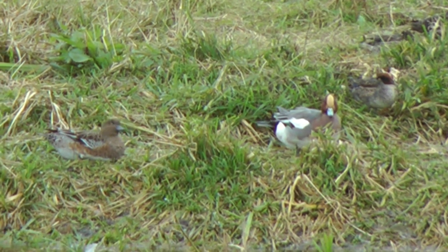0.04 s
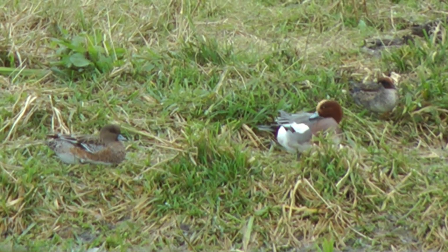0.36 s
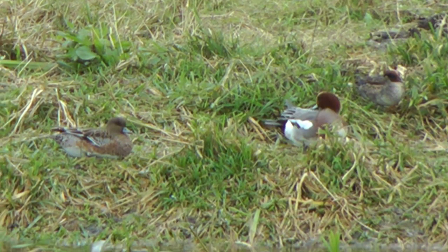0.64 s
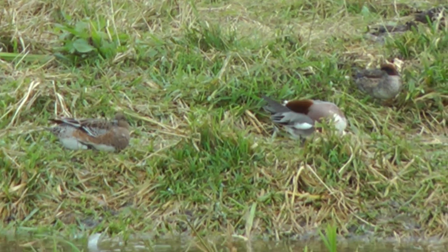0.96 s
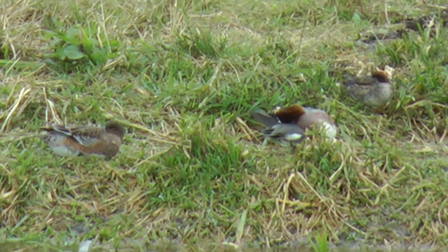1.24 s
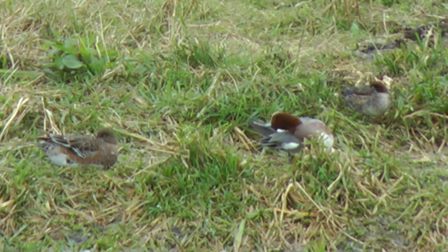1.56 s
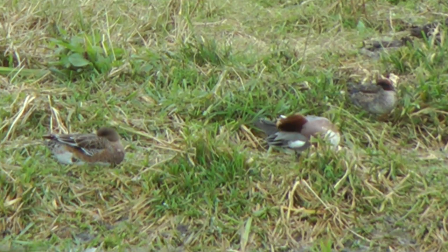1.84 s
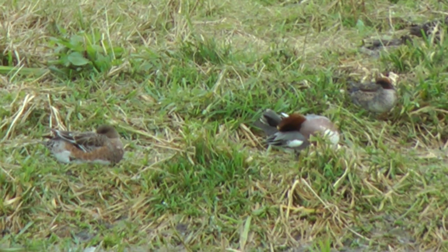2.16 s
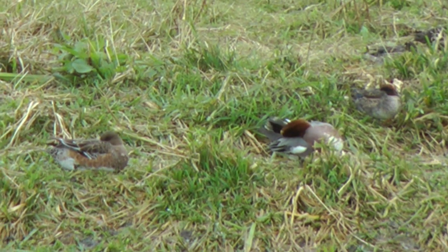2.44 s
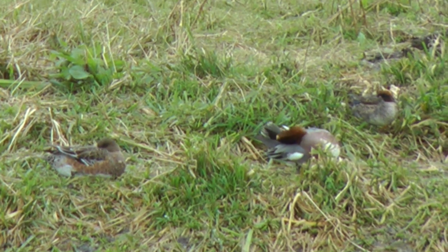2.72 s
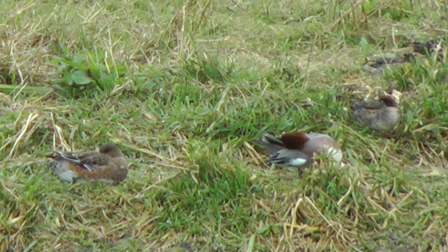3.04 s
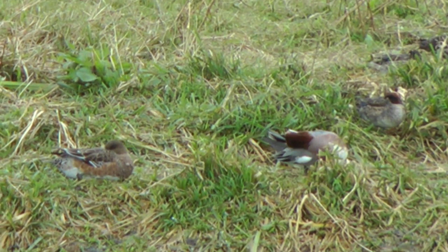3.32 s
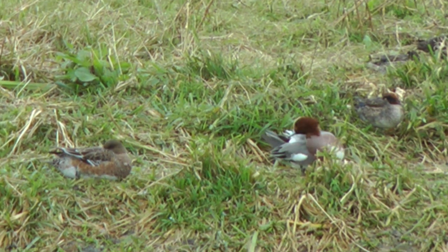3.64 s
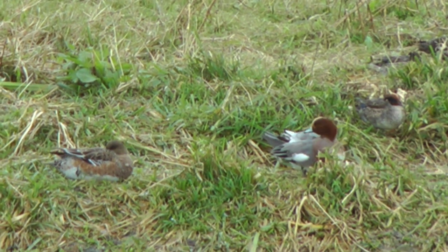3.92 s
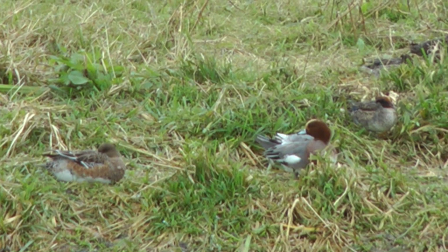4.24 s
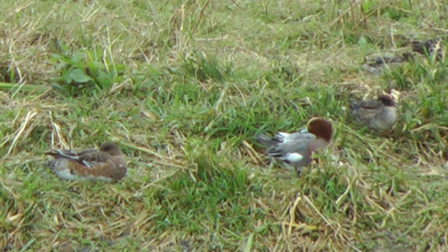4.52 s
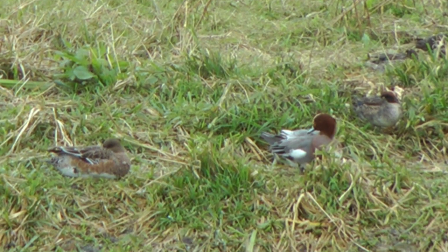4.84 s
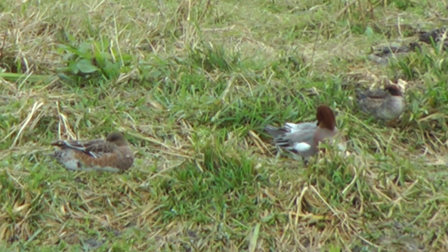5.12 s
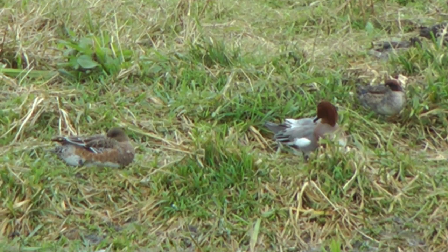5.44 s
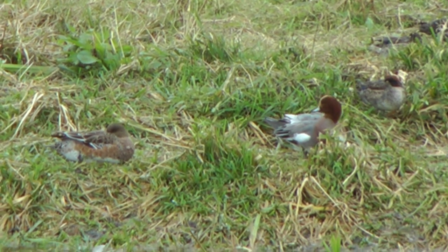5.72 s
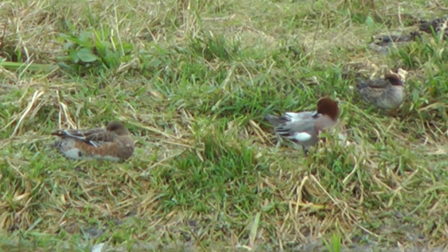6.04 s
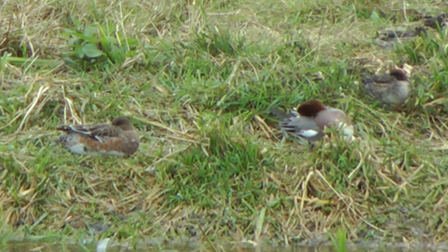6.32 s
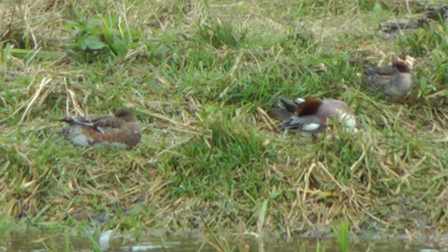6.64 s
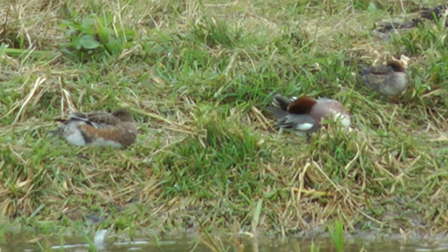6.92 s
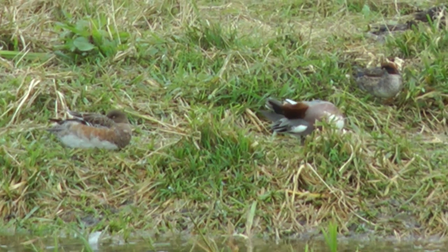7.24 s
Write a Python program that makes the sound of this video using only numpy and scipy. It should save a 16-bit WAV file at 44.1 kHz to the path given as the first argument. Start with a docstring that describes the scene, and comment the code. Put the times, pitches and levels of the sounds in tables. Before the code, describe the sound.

A steady outdoor hush lies over a grassy wetland bank, with a faint crackle of grass and water. From the start, distant ducks give thin, arching whistles and short raspy yelps with a slight echo. At about 0.2 seconds a hard gust cracks, rumbles and flutters on the microphone until roughly 0.7 seconds; it is the loudest sound and briefly dips the volume. Weaker gusts come near 2, 2.7, 4.5 to 5.4, 6 and 7 seconds. Small dry ticks fall around 1.1, 1.9, 2.4 and 4.7 seconds. Near 4 seconds one closer duck on the left gives a short whistle that glides up and then down, echoing lightly. The far flock keeps calling on and off over faint marsh chatter. The hush swells gently near 5.7 seconds, and a few soft rustles follow until the end at about 7.5 seconds.

```python
"""Wigeon (a kind of duck) whistle on a grassy wetland bank, over the steady hush of open land.
The flock whistles and yelps far off from the start. At once the hardest gust cracks, rumbles and flutters
on the microphone, which turns itself down for a moment. Weaker gusts and small dry ticks follow.
Near 4 s one drake (a male) close by on the left gives a "whee-oo", a tone that glides up and down.
Near 5.7 s the hush swells once, and a few rustles come towards the end."""
import sys
import numpy as np
from scipy import signal
from scipy.fft import rfft, irfft, next_fast_len
from scipy.io import wavfile
from scipy.ndimage import uniform_filter1d, minimum_filter1d

SR = 44100
rng = np.random.default_rng(int(sys.argv[2]) if len(sys.argv) > 2 else 0)


def output_pcm(signal):
    """Save a mono or channel-first signal as 16-bit PCM at the path in sys.argv[1].

    Samples are clipped to [-1, 1] before scaling.
    """
    pcm = np.clip(np.atleast_2d(signal).T, -1, 1) * 32767
    wavfile.write(sys.argv[1], SR, np.round(pcm).astype(np.int16))


N = 329427
TIME = np.arange(N) / SR


def drake():
    """The near bird and its echoes; its throat rings near 4300 Hz, lifting the octave as the pitch falls."""
    # the path of the "whee-oo": t/s, f/Hz, relative level/dB
    whee_oo = [(3.88, 1390, -50), (3.905, 2660, -49), (3.931, 3050, -49), (3.94, 3405, -47),
               (3.96, 3350, -45), (3.966, 3010, -49.5), (3.987, 2844, -50), (3.996, 2854, -43.5),
               (4.021, 2714, -52), (4.029, 2664, -43), (4.051, 2510, -43), (4.057, 2166, -48),
               (4.116, 1794, -48)]
    # the throat's boost: f/Hz, gain/dB
    throat = [(3400, 0), (4300, 13), (5100, -2)]
    voice = whistles([whee_oo], breath=.015, shimmer_db=2, edge_s=.004, waver=.006)
    call = filtered(voice, lambda hz: amp(along(throat, hz)))
    echo = amp(-5) * scatter(call, fade_s=.14)
    far_bank = amp(-12.5) * np.pad(call, (int(.135 * SR), 0))[:N]  # the call returns 0.135 s later
    return placed(call, left_db=8) + echo + far_bank


def whistles(calls, breath, shimmer_db, edge_s, waver):
    """Each path (t/s, f/Hz, level/dB) becomes a gliding tone; breath is its hoarse share, from 0 to 1."""
    out = np.zeros(N)
    hiss = wobble(600) + 1j * wobble(600)
    buzz_hz = 464.6 * np.exp(wobble(60) / 10)  # a hoarse throat buzzes under the whistle
    buzz = np.sin(2 * np.pi * np.cumsum(buzz_hz) / SR)
    rasp = np.sqrt(1 - breath) + np.sqrt(breath) * (.6 * hiss + .75 * buzz)
    shimmer = amp(shimmer_db * np.minimum(wobble(70), .5))  # the loudness flickers
    pitch_drift = 1 + waver * wobble(90)
    for call in calls:
        s, hz, db = np.transpose(call)
        on = slice(*np.searchsorted(TIME, [s[0] - edge_s, s[-1] + edge_s]))
        t = TIME[on]
        phase = 2 * np.pi * np.cumsum(np.interp(t, s, hz) * pitch_drift[on]) / SR
        fade = np.clip(1 + np.minimum(t - s[0], s[-1] - t) / edge_s, 0, 1)
        octave = amp(-22) * np.exp(2j * phase)  # a weak tone at twice the pitch
        tone = np.imag(rasp[on] * (np.exp(1j * phase) + octave))
        out[on] += np.sqrt(2) * fade * amp(np.interp(t, s, db)) * unit(shimmer[on]) * tone
    return out


def flock():
    """Farther birds: thin whistles broken by the moving air, and hoarse yelps, all blurred by echo."""
    # whistles at their highest pitch: t/s, f/Hz, relative level/dB, rise/s, fall/s
    thin_whistles = [ (0.041, 2600, -50, 0.079, 0.057), (.435, 2140, -43.5, .011, 0.013),
                     (0.57, 2845, -44.5, .039, 0.018), (.588, 2293, -44, 0.0084, 0.021),
                     (0.646, 3324, -57, 0.035, 0.15), (.901, 3050, -53.5, .05, .155),
                     (1.535, 3390, -58, 0.0713, .18), (3.151, 2540, -52, .034, 0.0049),
                     (3.195, 2357, -49.5, .01, .08), (3.405, 3265, -56, 0.059, 0.027),
                     (3.464, 2560, -54, 0.012, .05), (4.32, 3210, -55, 0.051, 0.067),
                     (4.378, 2476, -49.5, .013, 0.047), (4.435, 2950, -55.5, 0.0186, 0.072),
                     (4.52, 2244, -46.5, 0.023, 0.047), (4.77, 2930, -56, .025, .04),
                     (4.88, 2470, -52, 0.011, 0.052), (4.919, 2870, -56, .025, .06),
                     (5.595, 2180, -44.5, .01, 0.032), (6.445, 2870, -55, .015, 0.082), ]
    # short, raspy yelps at their highest pitch: t/s, f/Hz, relative level/dB
    yelps = [(.812, 1794, -47), (.932, 2110, -48), (1.959, 2660, -52.5), (2.089, 2996, -53),
             (2.221, 3045, -53.5), (2.463, 3140, -54.5), (3.104, 2480, -50.5), (3.24, 2586, -51),
             (4.334, 2160, -48.5), (5.555, 2880, -47), (5.88, 2140, -47), (6.255, 3190, -58),
             (7.22, 2570, -53)]
    arches = [whistle_path(*row) for row in thin_whistles]
    hooks = [path for row in yelps for path in yelp_paths(*row)]
    calls = whistles(arches, breath=.21, shimmer_db=6, edge_s=.008, waver=.017)
    calls += whistles(hooks, breath=.12, shimmer_db=3, edge_s=.008, waver=.014)
    return amp(-3.5) * calls + amp(-7.5) * scatter(calls, fade_s=.25)


def whistle_path(top_s, top_hz, db, rise_s, fall_s):
    """One flock whistle climbs steeply, rounds off at the top and falls more gently."""
    rise_hz_per_s, fall_hz_per_s, round_s = 34000, 7800, .018
    t = np.linspace(-rise_s, fall_s)
    below_hz = np.where(t < 0, rise_hz_per_s, fall_hz_per_s) * (np.hypot(t, round_s) - round_s)
    swell_db = .006 * below_hz  # louder below the top
    taper_db = 3.5 * (t / np.where(t < 0, rise_s, fall_s)) ** 2  # softer towards both ends
    return np.transpose([top_s + t, top_hz - below_hz, db + swell_db - taper_db])


def yelp_paths(top_s, top_hz, db):
    """One yelp goes up and down equally steeply: a main tone and a weaker, lower one."""
    half_s, drop_hz, taper_db = .028, 607.6, 3.5
    position = np.linspace(-1, 1)
    s = top_s + half_s * position
    hz = top_hz - drop_hz * position ** 2
    level = db - taper_db * position ** 2
    return np.transpose([s, hz, level]), np.transpose([s, .75 * hz, level - 5])


def chatter(count=190):
    """The rest of the marsh: many short, falling far notes that run together."""
    calls = []
    for when, pitch, bend, softness in rng.random((count, 4)):
        s = when ** .75 * TIME[-1]  # the marsh grows livelier
        hz = 1200 * 2.3 ** pitch
        db = -57 - 8 * softness - 5 * pitch
        calls.append([(s, hz, db), (s + .0496, hz * (1 - .225 * bend), db)])
    notes = whistles(calls, breath=.15, shimmer_db=3, edge_s=.015, waver=.012)
    return notes + .5 * scatter(notes, fade_s=.063)


def wind():
    """Slow pressure moves both microphone openings together; swirls thump and push left against right."""
    # swirls of air that hit the openings: t/s, flutter level/dB, thump level/dB, length/s
    swirls = [(0.212, -15.5, -21, 0.024), (0.286, -10, -32, 0.052), (0.32, -10.5, -14.5, 0.069),
              (0.364, -9.5, -18.5, 0.035), (0.446, -20, -26, 0.11), (0.634, -32, -38, 0.078),
              (0.72, -42.5, -31, 0.047), (1.249, -62, -42, 0.037), (2.002, -30.5, -30.5, 0.084),
              (2.286, -31.5, -34, 0.017), (2.749, -28, -25, 0.037), (2.821, -32, -30, 0.094),
              (2.921, -28.5, -40, 0.018), (2.967, -27, -45, 0.0084), (3.079, -45, -32.5, 0.024),
              (3.14, -53, -33.5, 0.021), (3.324, -51, -29.5, 0.036), (3.482, -41, -36, 0.027),
              (3.584, -41.5, -35, 0.047), (3.757, -40.5, -36, 0.012), (3.988, -49, -29, 0.0087),
              (4.023, -27.5, -26, 0.024), (4.151, -39.5, -37, 0.019), (4.455, -25.5, -17, 0.021),
              (4.513, -26.5, -29.5, 0.052), (4.603, -24.5, -35, 0.018), (4.781, -35, -31.5, 0.035),
              (4.922, -28.5, -26.5, 0.041), (5.023, -16.5, -21, 0.016), (5.219, -39, -31.5, 0.049),
              (5.401, -32, -27.5, .011), (6.11, -26.5, -22, 0.035), (6.319, -37, -31, 0.015),
              (6.541, -29, -30, 0.024), (7.04, -40, -29.5, 0.029), (7.125, -46, -35, 0.021),
              (7.376, -40, -33.5, 0.026)]
    # tone colours of the deep rumble, the flutter and the fine crackle: f/Hz, relative level/dB
    rumble_colour = [(20, -15.5), (75, 2.5), (100, -2.5), (130, -14), (250, -19), (1000, -87)]
    flutter_colour = [(40, -27), (130, -7), (235, 4), (320, 0), (430, -4), (500, -10.5), (1300, -36),
                      (8000, -112)]
    crackle_colour = [(300, -13), (460, 13.5), (1000, -1), (2000, -16), (7000, -74)]
    gust_db = gust_level()
    puff_db = 4.5 * np.minimum(wobble(24), 1)
    thumps = swells([(s, db, length) for s, _, db, length in swirls])
    pressure = steadied(noise(rumble_colour, alike=.99), span_s=.0341)
    rumble = np.hypot(amp(gust_db + puff_db), thumps) * pressure
    # flutter grows faster than the pressure that drives it
    gust_force = amp(1.5 * gust_db + 2 * puff_db + 1.5)
    swirl_force = swells([(s, db, length) for s, db, _, length in swirls])
    force = np.hypot(gust_force, swirl_force)
    lumps = unit(amp(3 * np.minimum(wobble(70), .5)))
    flutter = force * lumps * steadied(noise(flutter_colour, alike=-.61), span_s=.0092)
    # the hardest swirls break into finer ones that crackle
    grain = unit(amp(4 * wobble(300)))
    crackle = force ** 1.586 * grain * noise(crackle_colour, alike=-.52)
    return rumble + flutter + crackle


def gust_level():
    """Wind pressure in dB: each gust arrives fast, sags while it blows and dies away into the calm."""
    # gusts on the microphone: start/s, length/s, level/dB
    gusts = [(0.162, 0.56, -29.5), (1.956, 0.4, -38), (2.682, 0.37, -31.5), (3.43, 1, -40.5),
             (4.46, 0.926, -36), (6.044, 0.53, -37), (6.967, 0.6, -40.5)]
    rise_db_per_s, sag_db_per_s, fall_db_per_s, calm_db = 237, 4, 146, -55.5
    power = amp(calm_db) ** 2
    for start, length, db in gusts:
        age = TIME - start
        drop_db = (rise_db_per_s * np.maximum(-age, 0)
                   + sag_db_per_s * np.maximum(age, 0)
                   + fall_db_per_s * np.maximum(age - length, 0))
        power = power + amp(db - drop_db) ** 2
    return 10 * np.log10(power)


def ticks_and_rustles(faint_count=30):
    """A crack of wind and dry ticks with a short echo, faint ticks ever more often, and grainy rustles."""
    # a sharp crack of wind on the microphone, then small dry ticks: t/s, level/dB, f/Hz
    crack_and_ticks = [(.216, -40.5, 1880), (1.11, -37, 980), (1.879, -38.5, 1700), (2.3563, -39.5, 2890),
                       (2.3605, -45, 6000), (4.705, -40.5, 3000), (5.851, -51, 2600), (6.093, -45.5, 4500),
                       (7.177, -48, 4330)]
    # rustles along the bank: t/s, level/dB, length/s
    rustles = [(5.8, -55.5, 0.33), (6.89, -55.5, 0.1), (7.17, -59, 0.18), (7.44, -53, 0.11)]
    # tone colour of a rustle: f/Hz, relative level/dB
    rustle_colour = [(400, -32), (1250, -3), (2200, 11), (4000, -1), (12000, -50)]
    faint_ticks = [(np.sqrt(when) * TIME[-2], -50.5 - 9 * softness, 3800)
                   for when, softness in rng.random((faint_count, 2))]
    snaps = np.zeros(N)
    for s, db, hz in crack_and_ticks + faint_ticks:
        start = np.searchsorted(TIME, s)
        age = TIME[start:start + SR // 10] - s
        band = signal.butter(2, [hz / 1.93, hz * 1.31], "bandpass", fs=SR, output="sos")
        snap = unit(signal.sosfilt(band, rng.standard_normal(len(age))))
        snaps[start:start + len(age)] += amp(db) * snap * amp(-60 * age / .021)
    grain = unit(amp(3.3 * wobble(160)))
    rustle = swells(rustles) * grain * noise(rustle_colour, alike=.83)
    return snaps + scatter(snaps, fade_s=.093) + rustle


def land():
    """The far hush of open country, which swells once, with a faint crackle of grass and water."""
    # tone colour of the hush: f/Hz, relative level/dB
    hush_colour = [(70, 4.5), (135, -11.5), (300, -7.5), (480, -12), (680, -7.5), (1400, -13.5),
                   (3600, -22), (6000, -27), (8500, -34), (15000, -35)]
    # how alike the hush is in both ears: f/Hz, likeness (1 = the same)
    hush_alike = [(70, 0.16), (300, 0.072), (1400, 0.78)]
    # the swell in the middle pitches of the hush: t/s, level/dB, length/s
    hush_swells = [(5.7, -54.5, 0.73)]
    # tone colours of the swell and the crackle: f/Hz, relative level/dB
    swell_colour = [(600, -19), (1200, 9), (2600, -38)]
    crackle_colour = [(700, -7), (1300, 6), (6000, -16.5), (12000, -27)]
    hush = amp(-51) * noise(hush_colour, hush_alike)
    swell = swells(hush_swells) * noise(swell_colour, alike=.81)
    grain = unit(amp(2 * wobble(16) + 3.7 * wobble(230)))
    crackle = amp(-57.5) * grain * noise(crackle_colour, alike=.43)
    return hush + swell + crackle


def scatter(x, fade_s):
    """The blurred echo of bank and water, different in each ear; it falls 60 dB in fade_s."""
    t = TIME[:SR // 2]
    onset = 1 - np.exp(-t / .00079)
    tail = rng.standard_normal((2, len(t))) * amp(-60 * t / fade_s) * onset
    return signal.fftconvolve(x[None], tail / np.linalg.norm(tail[0]), axes=1)[:, :N]


def amp(db):
    """Turn decibels into a number to multiply by."""
    return 10 ** (np.asarray(db) / 20)


def unit(x):
    """Scale x to an average strength (rms) of 1."""
    return x / np.sqrt(np.mean(x ** 2) + 1e-20)


def along(points, hz):
    """Read between (f/Hz, value) points, giving each octave equal room."""
    f, values = np.transpose(points)
    return np.interp(np.log(hz + 1), np.log(f + 1), values)


def wobble(rate):
    """A smooth curve through random points, rate of them a second."""
    points = rng.standard_normal(int(TIME[-1] * rate) + 2)
    smooth = signal.resample(points, 10 * len(points))
    return np.interp(TIME * rate * 10, np.arange(len(smooth)), smooth)


def filtered(x, response):
    """Multiply each frequency in x by response(hz)."""
    size = next_fast_len(N + SR // 2)
    hz = np.fft.rfftfreq(size, 1 / SR)
    return irfft(rfft(x, size) * response(hz), size)[..., :N]


def noise(colour, alike):
    """Stereo noise; alike (a number or a table) runs from -1, ears opposite, to 1, ears the same."""
    def response(hz):
        likeness = np.clip(along(alike, hz) if np.ndim(alike) else np.full_like(hz, alike), -1, 1)
        return amp(along(colour, hz)) * np.sqrt([1 + likeness, 1 - likeness])
    mid, side = filtered(rng.standard_normal((2, N)), response)
    return unit(np.array([mid + side, mid - side]))


def steadied(x, span_s):
    """Even out the chance swells of a noise over span_s."""
    power = uniform_filter1d(np.mean(x ** 2, axis=0), int(span_s * SR))
    return x / np.sqrt(np.abs(power) + 1e-6)


def swells(rows):
    """Bell-shaped rises in loudness (t/s, level/dB, length/s); length is the width at half height."""
    power = 0
    for s, db, length in rows:
        distance = 2 * (TIME - s) / length
        bell = .5 ** np.minimum(distance ** 2, 20)
        power = power + (amp(db) * bell) ** 2
    return np.sqrt(power)


def placed(x, left_db):
    """Set a sound to one side, left_db louder in the left ear than in the right."""
    return x * amp([[left_db / 2], [-left_db / 2]])


def gain_control(x, threshold_db, max_cut_db, hold_s, recover_db_per_s):
    """Loud peaks turn the volume down at once; it waits, then creeps back."""
    peak_db = 20 * np.log10(np.abs(x).max(axis=0) + 1e-9)
    excess_db = np.clip(peak_db - threshold_db, 0, max_cut_db)
    hold = int(hold_s * SR)
    cut_db = -minimum_filter1d(-excess_db, hold, origin=(hold - 1) // 2)  # the largest recent excess
    recovery_db = recover_db_per_s * TIME
    return x * amp(recovery_db - np.maximum.accumulate(cut_db + recovery_db))


def scene():
    """Birds, wind and ground together."""
    return drake() + flock() + chatter() + wind() + ticks_and_rustles() + land()


def record(dry):
    """The microphone's automatic volume dips on loud peaks, and the highest treble is cut off."""
    held = gain_control(dry, threshold_db=-5, max_cut_db=9, hold_s=.15, recover_db_per_s=30.7)
    return filtered(held, lambda hz: hz < 15730)


dry = scene()
out = record(dry)
output_pcm(out)
```